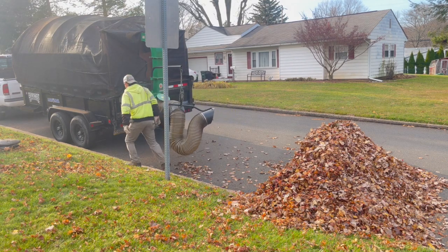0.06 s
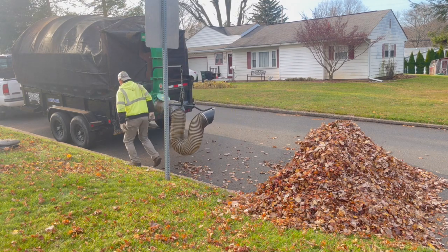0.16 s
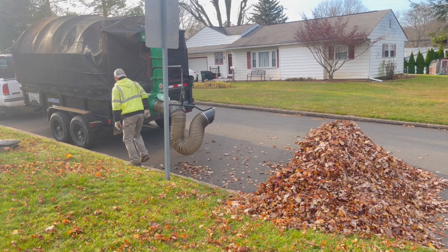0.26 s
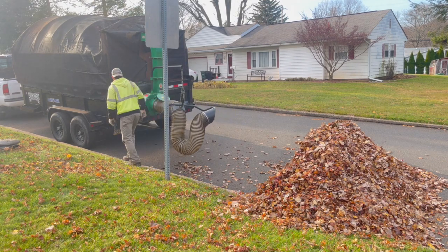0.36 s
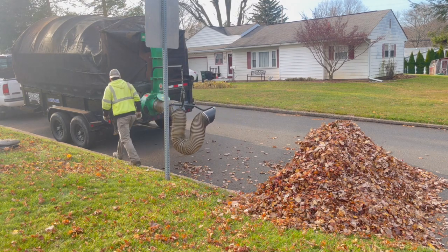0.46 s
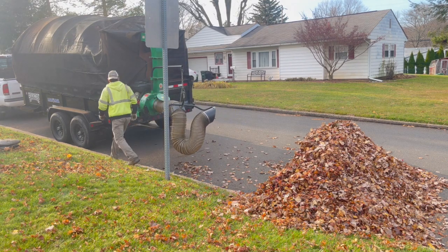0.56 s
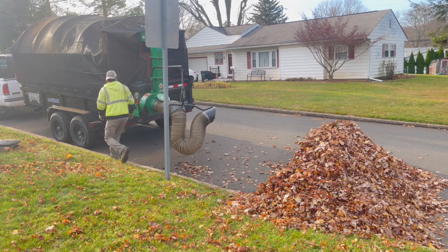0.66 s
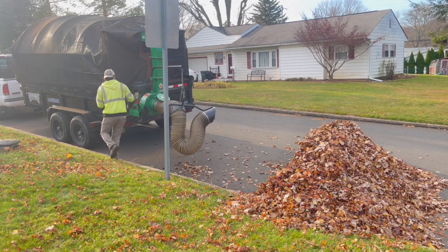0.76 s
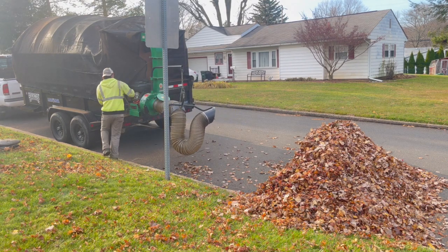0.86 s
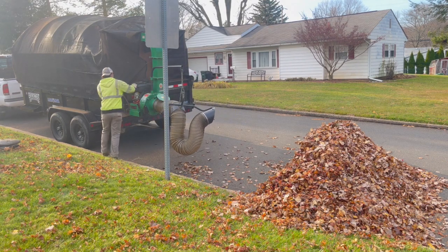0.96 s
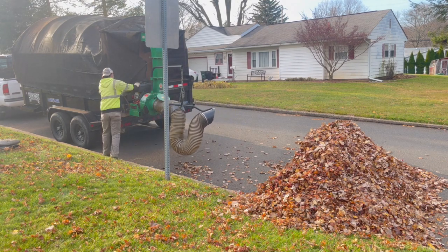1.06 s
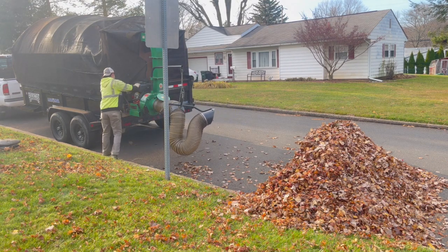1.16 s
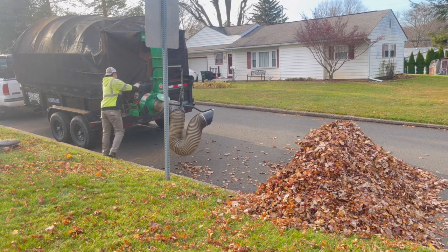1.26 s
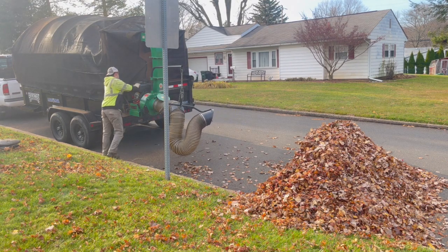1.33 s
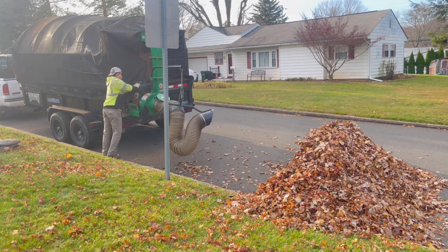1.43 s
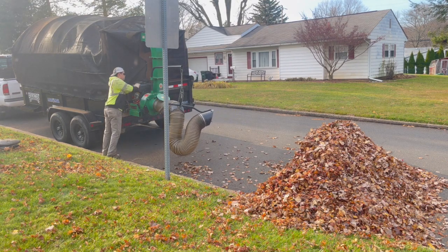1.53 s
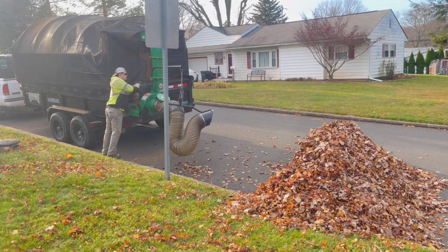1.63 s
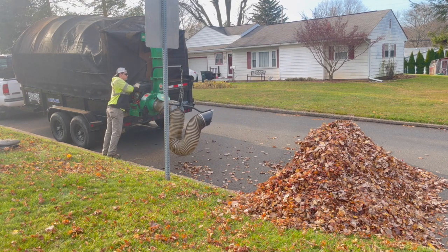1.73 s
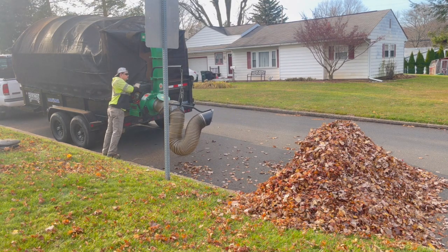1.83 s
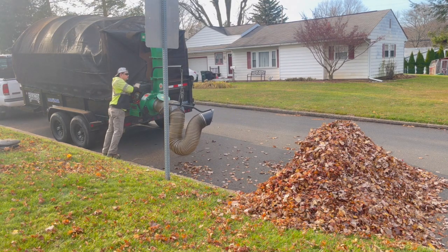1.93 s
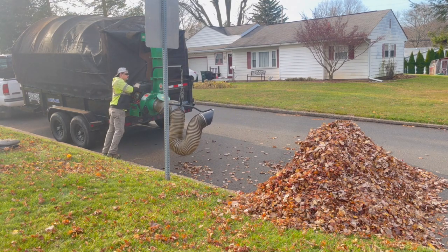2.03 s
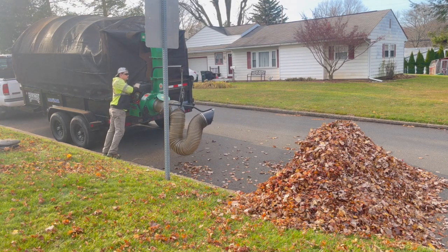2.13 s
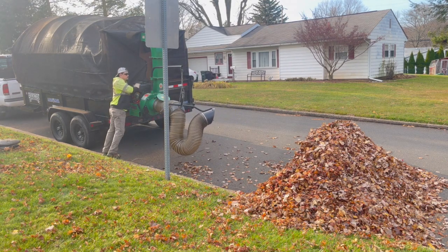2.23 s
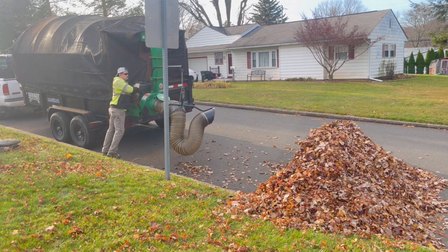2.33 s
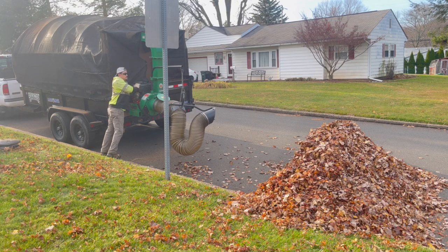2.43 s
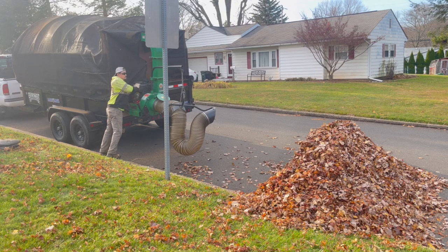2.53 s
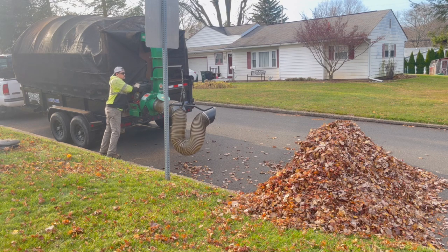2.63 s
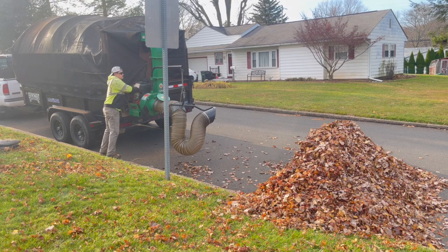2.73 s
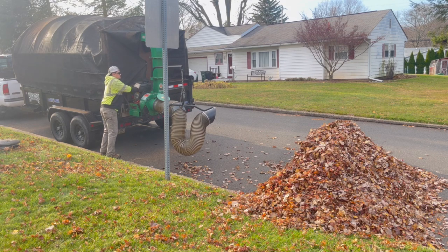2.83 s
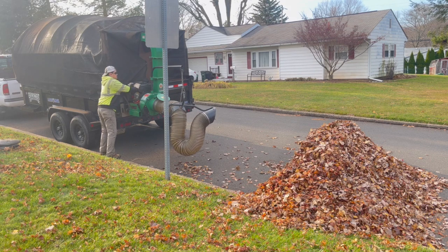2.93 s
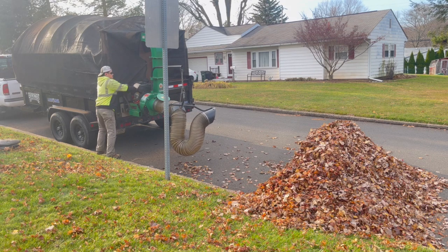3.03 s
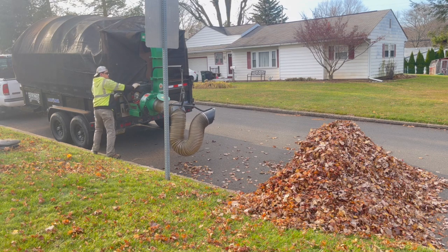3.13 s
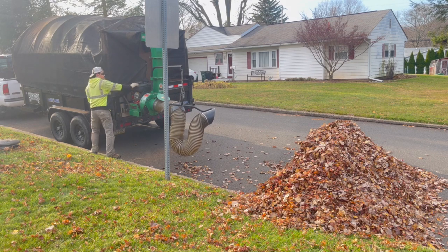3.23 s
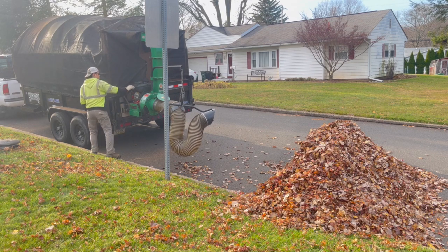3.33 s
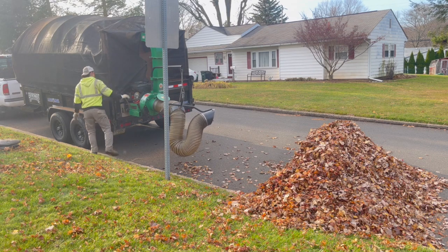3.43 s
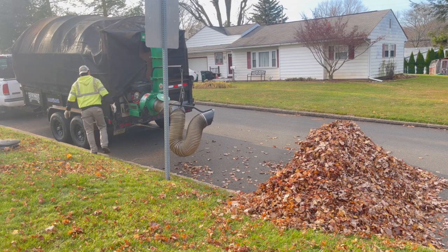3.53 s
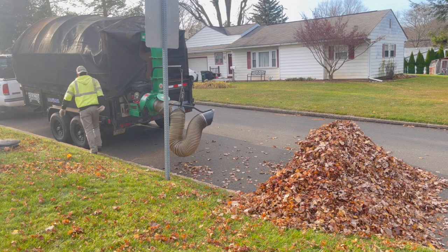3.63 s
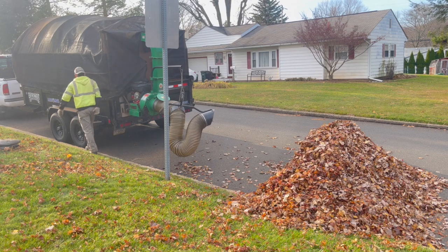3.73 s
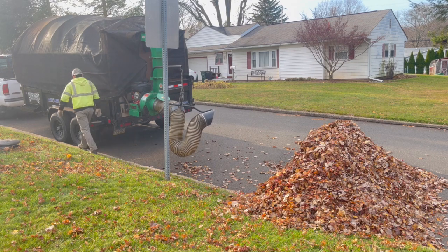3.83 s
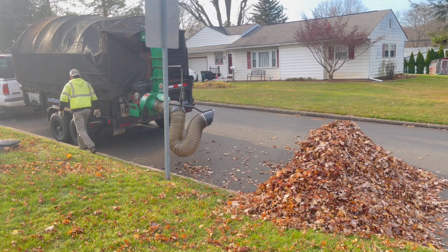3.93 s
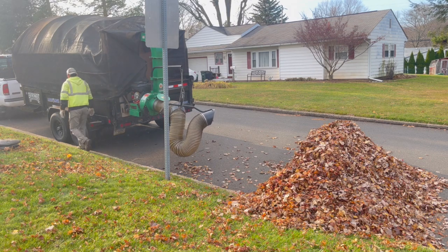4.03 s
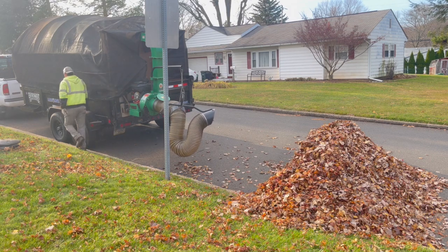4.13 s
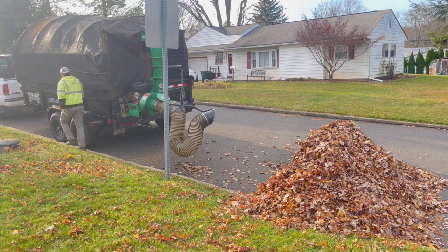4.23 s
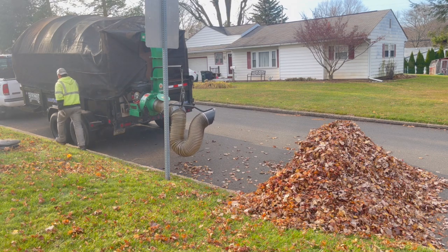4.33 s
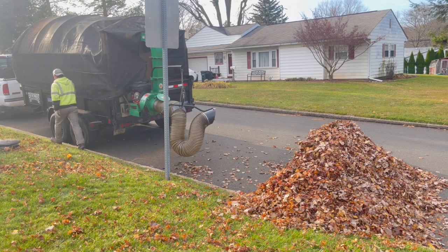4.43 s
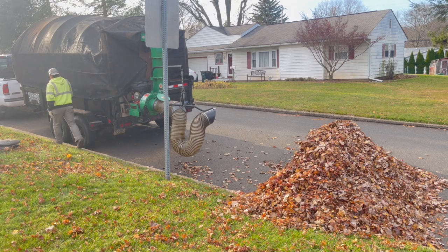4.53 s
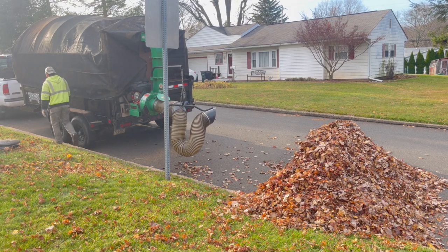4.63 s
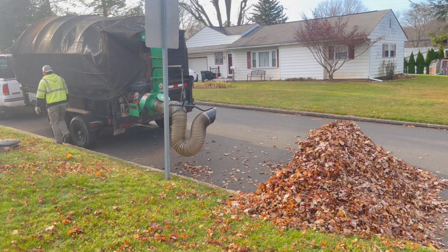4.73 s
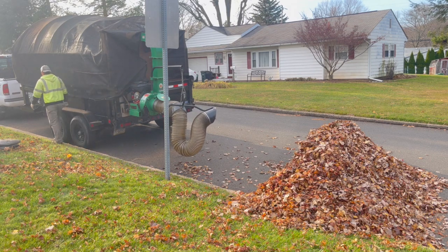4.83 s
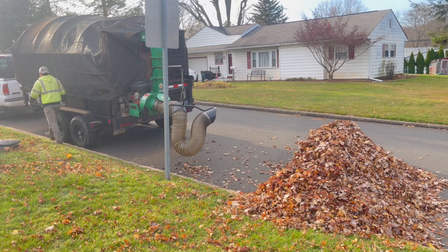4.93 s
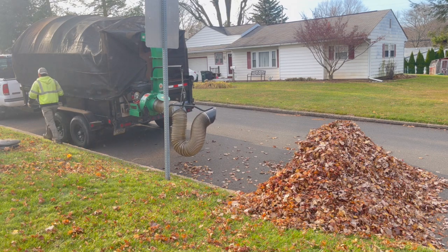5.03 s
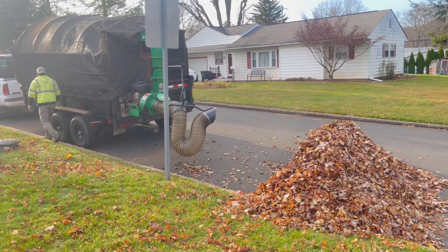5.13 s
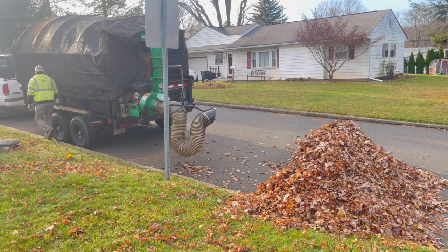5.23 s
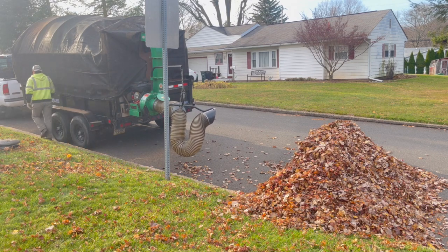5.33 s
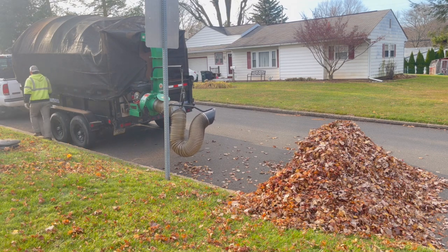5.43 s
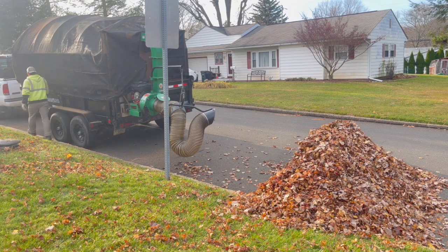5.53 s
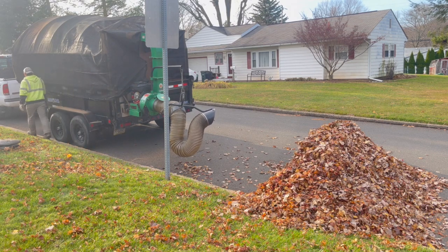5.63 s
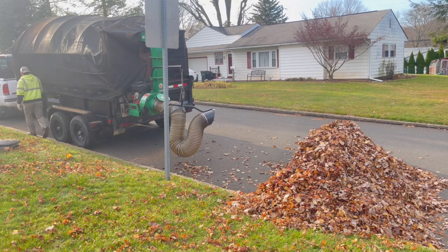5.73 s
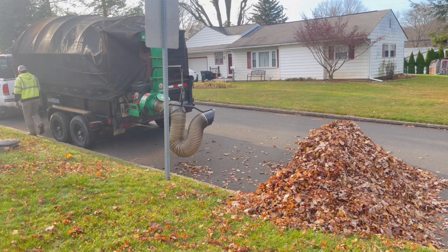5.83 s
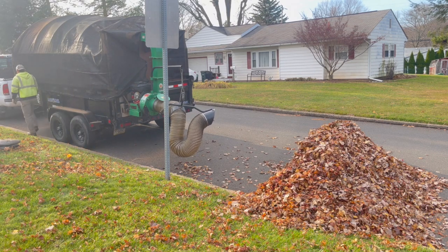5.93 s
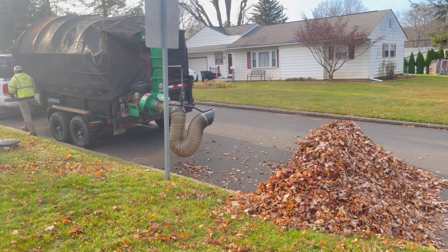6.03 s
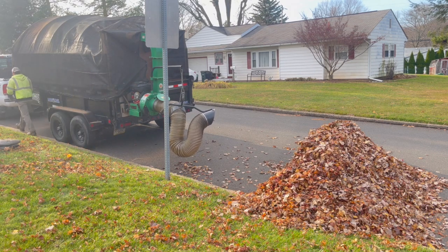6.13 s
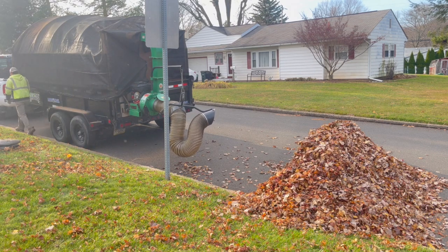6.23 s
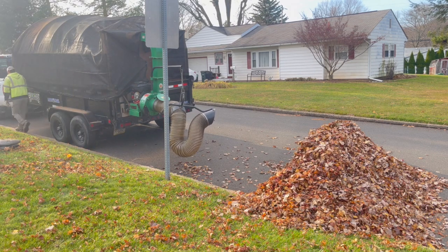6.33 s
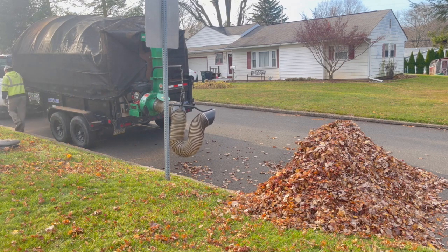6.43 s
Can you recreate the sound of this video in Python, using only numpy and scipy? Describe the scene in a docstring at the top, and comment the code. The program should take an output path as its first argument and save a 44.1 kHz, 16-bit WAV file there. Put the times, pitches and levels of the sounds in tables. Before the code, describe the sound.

A loud petrol leaf vacuum roars at full throttle, then winds down to a quieter, loping idle.

```python
"""A V-twin petrol engine drives a four-blade suction fan on a lawn trailer, left of a phone.
First it runs flat out: exhaust thuds, blade tones, buzzing panels, rushing air and valve-gear hiss.
At 2.15 s the throttle shuts; the exhaust gulps, and engine and fan coast down on their one shaft.
From 3.2 s the engine catches with stray firings, and from 4.25 s it settles into a loping idle."""
import sys
import numpy as np
from scipy import signal
from scipy.fft import rfft, irfft
from scipy.io import wavfile
from scipy.ndimage import uniform_filter1d

SR = 44100
rng = np.random.default_rng(int(sys.argv[2]) if len(sys.argv) > 2 else 0)


def bounce(signal):
    """Save signal as a 16-bit WAV file at the path given by the first command-line argument."""
    frames = np.transpose(np.atleast_2d(signal))
    limited = np.clip(frames, -1, 1)
    pcm = np.round(limited * 32767).astype(np.int16)
    wavfile.write(sys.argv[1], SR, pcm)


N = 286209
TIME_S = np.arange(N) / SR
FREQ_HZ = np.maximum(np.arange(N // 2 + 1) * SR / N, 1)
FULL_SPEED_HZ = 28.2


def undb(db):
    """Decibels to gain."""
    return 10 ** (np.asarray(db) / 20)


def per_bin(table):
    """A frequency table at every bin, interpolated on a log axis."""
    hz, value = np.transpose(table)
    return np.interp(np.log(FREQ_HZ), np.log(np.maximum(hz, 1)), value)


def drift(rate_hz):
    """Smooth random drift, standard deviation 1."""
    hold = int(SR / rate_hz)
    steps = np.repeat(rng.standard_normal(N // 100), hold)[:N]
    smooth = uniform_filter1d(uniform_filter1d(steps, hold), hold)
    return smooth / smooth.std()


# Rows: full load, overrun, catching, idle, stray firings
# (fade-in start [s], rise [s], fade-out start [s], fall [s], timing scatter [cycles], level scatter [dB])
ENGINE_STATES = [(-1, .5, 2.15, .06, .003, .45), (2.16, .06, 3.3, .14, .003, 1.3),
                 (3.2, .2, 4.25, .6, .005, 1.2), (4.25, .6, 8, .5, .002, .8), (3.2, .2, 4.2, .5, .045, 3)]
OVERRUN_S = ENGINE_STATES[1][0]


def state_shares():
    """Share 0-1 of each engine state over time."""
    return [np.clip((TIME_S - on_s) / rise_s, 0, 1) * np.clip(1 - (TIME_S - off_s) / fall_s, 0, 1)
            for on_s, rise_s, off_s, fall_s, *_ in ENGINE_STATES]


# One list per engine state; places over 1 belong to the second cylinder
# (place [cycles], ring [Hz], width [Hz], kick [dB], push or suck [+1/-1])
GAS_PULSES = [
    [(.703, 169, 30, 42.5, 1), (.902, 74, 23, 42.4, 1), (.897, 132, 35.5, 46, 1), (1.204, 114, 66, 42.9, 1)],
    [(.671, 121, 39, 29, 1), (.671, 68, 35, 29, -1), (1.036, 121, 39, 26.5, 1), (1.036, 68, 35, 26, -1)],
    [(.566, 175, 43, 24, 1), (.731, 100, 57, 29.5, 1), (.95, 95, 99, 22.2, 1), (1.1, 200, 28, 20, 1),
     (1.044, 56, 28, 26, -1)],
    [(.568, 161, 35, 30, 1), (.728, 98, 54, 32.3, 1), (.877, 54.5, 18.5, 36, 1), (.894, 300, 300, 16.5, 1),
     (1.111, 142, 143, 29.2, 1), (1.15, 56, 42, 30.6, -1)],
    [(.45, 210, 60, 19, 1), (1.15, 170, 110, 23, 1)],
]


def exhaust(cycle, muffler_hz=305, gulp_db=7.5, gulp_decay_s=.23):
    """Two unevenly firing cylinders send gas pulses that ring the muffler's chambers."""
    lead_in = 8192  # samples; earlier pulses still ring at time zero
    counts = np.arange(-5, int(cycle[-1]) + 1)
    cycle = np.r_[cycle[0] - (cycle[1] - cycle[0]) * np.arange(lead_in, 0, -1), cycle]
    n = len(cycle)
    freq_hz = np.arange(n // 2 + 1) * SR / n
    size, slip = rng.standard_normal((len(counts), 2, 2)).T
    shares = state_shares()
    shares[1] *= undb(gulp_db * np.exp(-np.maximum(TIME_S - OVERRUN_S, 0) / gulp_decay_s))
    spectrum = 0
    for pulses, share, (*_, scatter_cycles, scatter_db) in zip(GAS_PULSES, shares, ENGINE_STATES):
        for place, ring_hz, width_hz, kick_db, sign in pulses:
            cylinder = int(place > 1)
            due_cycles = counts + place + scatter_cycles * slip[cylinder]
            at = np.interp(due_cycles, cycle, np.arange(n)).astype(int)
            strength = undb(kick_db + scatter_db * size[cylinder])
            kicks = np.zeros(n)
            kicks[at] = sign * strength * share[np.maximum(at - lead_in, 0)]
            kicks[[0, -1]] = 0  # drop out-of-range pulses
            # triple pole: the ring swells, then fades
            pole = 1 + 1j * (freq_hz - ring_hz) / width_hz
            mirror = 1 + 1j * (freq_hz + ring_hz) / width_hz
            spectrum += -1j * (pole ** -3 - mirror ** -3) * rfft(kicks)
    return irfft(spectrum / (1 + (freq_hz / muffler_hz) ** 8), n)[lead_in:]


# Fan housing and hose resonances (centre [Hz], width [Hz], gain [dB])
HOUSING_MODES = [(158, 11, -25), (178, 6, -17.5), (186, 3.4, -20), (195.8, 13.7, -13), (219.5, 12, -33),
                 (262, 17, -32), (296, 26, -44), (343, 32, -27.5), (387, 15, -26.5), (407, 20, -26),
                 (435, 27, -31), (458, 16, -24), (525.4, 17, -23.5), (645, 24, -29), (715, 24, -29),
                 (790, 30, -26)]
# Blade-rate harmonics 1-4 (level [dB], waver [dB], low cutoff [Hz])
BLADE_TONES = [(0, .6, 157), (-1.5, 1.8, 157), (-9, 2.5, 450), (-19, 3, 480)]


def fan(cycle, speed_hz, db_per_octave=4, lag_rad=2.71):
    """Blade tones swell as they glide through the housing resonances; hose gusts shift their phase."""
    passes_per_cycle = 8  # four blades, two turns
    gust_rad = .15 * drift(8.3)
    blade_rad = 2 * np.pi * passes_per_cycle * cycle - lag_rad + gust_rad
    speed_db = db_per_octave * np.log2(speed_hz / FULL_SPEED_HZ)
    tones = 0
    for harmonic, (level_db, waver_db, cutoff_hz) in enumerate(BLADE_TONES, 1):
        tone_hz = passes_per_cycle * harmonic * speed_hz
        housing = abs(sum(undb(gain_db) / (1 + 2j * (tone_hz - mode_hz) / width_hz)
                          for mode_hz, width_hz, gain_db in HOUSING_MODES))
        low_cut = 1 / (1 + (cutoff_hz / tone_hz) ** 12)
        gain = undb(level_db + speed_db + waver_db * drift(14))
        tones += np.sqrt(2) * housing * low_cut * gain * np.cos(harmonic * blade_rad)
    return tones


# Casing vibration (order [per cycle], full load [dB], coasting [dB], idle [dB])
CASING_ORDERS = [(7, -57.5, -37, -57), (9, -70, -35.5, -59), (10, -74, -36, -57), (11, -47, -46, -64),
                 (12, -43.5, -44, -52), (14, -48, -53, -54), (15, -46.5, -46, -42.5), (19, -44, -40.5, -69),
                 (21, -57, -56, -64), (24, -54, -56, -51.5), (25, -44, -51, -61), (27, -61, -55.5, -52.5),
                 (32, -57, -58, -61), (35, -49, -69, -62), (36, -51.5, -70, -70), (50, -56, -82, -66)]


def casing_buzz(cycle, settle_s=.15, waver_db=2):
    """Shaft orders shake the panels, in a different mix under load, coasting and at idle."""
    load, overrun, _, idle, _ = state_shares()
    coast = np.minimum(overrun, np.clip((TIME_S - OVERRUN_S) / settle_s, 0, 1))
    buzz = 0
    for order, load_db, coast_db, idle_db in CASING_ORDERS:
        gain = load * undb(load_db) + coast * undb(coast_db) + idle * undb(idle_db)
        waver = undb(waver_db * drift(7.4))
        buzz += gain * waver * np.sin(2 * np.pi * (order * cycle + rng.random()))
    return np.sqrt(2) * buzz


# Sheet-metal resonances (centre [Hz], width [Hz], level [dB])
SHROUD_MODES = [(655, 28, -50), (993, 16, -53.5), (1224, 83, -54)]


def shroud_ring(cycle, speed_hz, knock_share=.65):
    """One knock a cycle and random shaking keep the shroud ringing."""
    modes = sum(undb(level_db) * np.sqrt(SR / (np.pi * width_hz)) / (1 + 2j * (FREQ_HZ - hz) / width_hz)
                for hz, width_hz, level_db in SHROUD_MODES)
    knocks = np.diff(np.floor(cycle), prepend=0) * np.sqrt(SR / speed_hz)
    drive = np.sqrt(knock_share) * knocks + np.sqrt(1 - knock_share) * rng.standard_normal(N)
    return irfft(modes * rfft(drive), N)


# Likeness of noise at the two microphone ports (frequency [Hz], coherence [0-1])
PORT_COHERENCE = [(60, .9997), (120, .998), (250, .99), (600, .93), (1400, .76), (3400, .85), (4500, .55),
                  (6200, .4), (7500, .97), (8500, .97), (9300, .6), (11000, .97), (12800, .97), (13700, .5),
                  (15000, .9)]


def stereo_noise(spectrum, band_hz):
    """Coloured noise, partly shared by both ports; rms 1 within band_hz."""
    shared, apart = rfft(rng.standard_normal((2, N)))
    coherence = per_bin(PORT_COHERENCE)
    gain = undb(per_bin(spectrum))
    in_band = (FREQ_HZ > band_hz[0]) & (FREQ_HZ < band_hz[1])
    gain /= np.sqrt(np.sum(gain[in_band] ** 2) / len(FREQ_HZ))
    mid = np.sqrt((1 + coherence) / 2) * shared
    side = np.sqrt((1 - coherence) / 2) * apart
    return irfft(gain * np.array([mid + side, mid - side]), N)


# Hose roar (frequency [Hz], relative density [dB])
ROAR_SPECTRUM = [(60, -7), (250, -13), (330, -12), (400, 4.5), (450, -3), (490, -9), (540, -8.5),
                 (700, -6.5), (900, -25.5), (2000, -63)]


def hose_roar(speed_octaves, level_db=-33.5, db_per_octave=25):
    """Air roars hollowly in the hose, dying away as the fan slows."""
    return undb(level_db + db_per_octave * speed_octaves) * stereo_noise(ROAR_SPECTRUM, (300, 500))


# Air rush (frequency [Hz], relative density [dB])
RUSH_SPECTRUM = [(40, 0), (80, 11), (140, 5.5), (250, 4), (310, 0), (410, 4), (600, 0), (850, -2),
                 (1500, -9), (2200, -11), (3500, -15.5), (4500, -21), (6500, -27.5), (15000, -44.5)]


def air_rush(speed_octaves, lift_db, level_db=-35, db_per_octave=13):
    """Air rushes through hose and housing, sinking with the speed."""
    gain = undb(level_db + lift_db + db_per_octave * speed_octaves + .3 * drift(8))
    return gain * stereo_noise(RUSH_SPECTRUM, (700, 2500))


# Treble hiss (frequency [Hz], relative density [dB])
HISS_SPECTRUM = [(1500, 3.5), (3000, 4.5), (5200, 5), (6800, 5), (8000, 0), (11500, 4), (13500, -3),
                 (15500, -10.5)]
# Valve events (place [cycles], Gaussian width [cycles], added height [x steady hiss])
VALVE_PUFFS = [(1, 0.01, 0.24), (0.95, 0.053, 0.59), (0.24, 0.051, .25)]


def valve_hiss(cycle, speed_octaves, lift_db, level_db=-53.5, db_per_octave=15.5):
    """Valve gear and cooling fins hiss, with a puff at each valve event."""
    puffs = 0
    for place, width_cycles, height in VALVE_PUFFS:
        offset_cycles = (cycle - place + .5) % 1 - .5
        puffs += height * np.exp(-.5 * (offset_cycles / width_cycles) ** 2)
    gain = undb(level_db + lift_db + db_per_octave * speed_octaves + .8 * drift(30))
    return gain * (1 + puffs) * stereo_noise(HISS_SPECTRUM, (9000, 13000))


# Four-stroke cycles, two shaft turns each (time [s], cycle rate [Hz])
ENGINE_SPEED = [(0, 28.13), (.7, 28.125), (.9, 28.175), (1.8, 28.21), (2.15, 28.25), (2.33, 26.9),
                (2.46, 25.7), (2.64, 24.5), (2.87, 23.1), (3.11, 21.8), (3.38, 20.5), (3.61, 19.5),
                (3.89, 18.42), (4.32, 17.3), (4.75, 16.6), (5.26, 15.93), (5.67, 15.7), (6.49, 15.47)]


def scene():
    """One shaft paces every source."""
    speed_hz = np.interp(TIME_S, *np.transpose(ENGINE_SPEED))
    speed_octaves = np.log2(speed_hz / FULL_SPEED_HZ)
    cycle = .041 + np.cumsum(speed_hz) / SR
    idle_lift_db = 1.5 * state_shares()[3]  # renewed firing adds rush and hiss
    machine = exhaust(cycle) + fan(cycle, speed_hz) + casing_buzz(cycle) + shroud_ring(cycle, speed_hz)
    air = hose_roar(speed_octaves) + air_rush(speed_octaves, idle_lift_db)
    return machine + air + valve_hiss(cycle, speed_octaves, idle_lift_db)


# Phase between the ports (frequency [Hz], left lead [rad])
PORT_PHASE = [(1, 0.07), (200, 0.14), (500, 0.65), (800, 1.1), (1400, 0.89), (2150, 1.6), (3300, 3.1),
              (4500, 3.14), (5400, 2.73), (6200, 2.72), (6900, 2.76), (8000, 3.14), (8800, 3.1),
              (9500, 0.35), (10500, 0.3), (13000, 0), (14500, -3.1)]
# Level between the ports (frequency [Hz], left minus right [dB])
PORT_BALANCE = [(60, -1), (200, -2), (500, -1.5), (900, 3), (1400, 3.5), (2100, -3.5), (3000, -0.5),
                (4000, 5), (5800, 4), (7400, -2), (15000, 2.5)]


def record(dry, bass_cut_hz=48, top_cut_hz=15030):
    """The phone's two ports differ in phase and level; it cuts deep bass and top treble."""
    left = undb(per_bin(PORT_BALANCE) / 2) * np.exp(.5j * per_bin(PORT_PHASE))
    faded = dry * signal.windows.tukey(N, .002)
    ports = irfft(rfft(faded) * np.array([left, 1 / left]), N)
    ports = signal.sosfilt(signal.butter(4, bass_cut_hz, "high", fs=SR, output="sos"), ports)
    return signal.sosfilt(signal.ellip(12, .2, 70, top_cut_hz, fs=SR, output="sos"), ports)


dry = scene()
out = record(dry)
bounce(out)
```